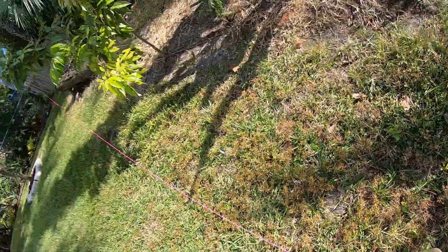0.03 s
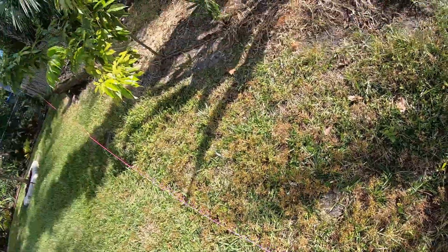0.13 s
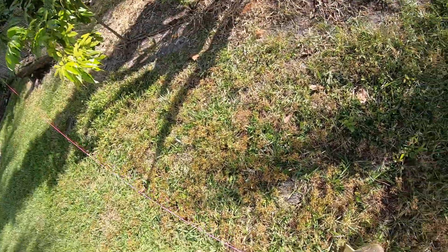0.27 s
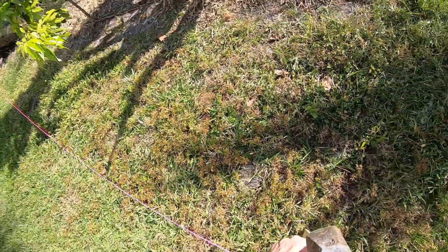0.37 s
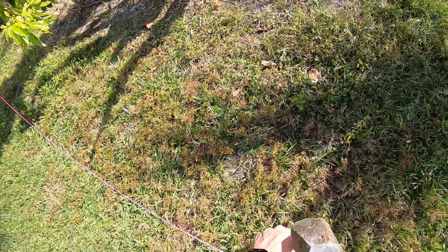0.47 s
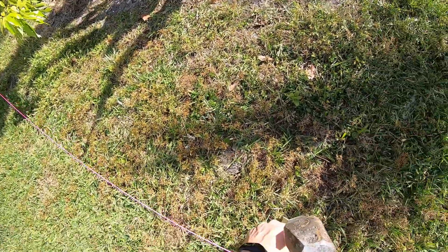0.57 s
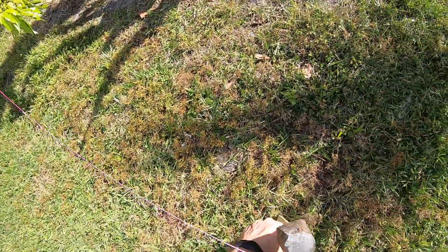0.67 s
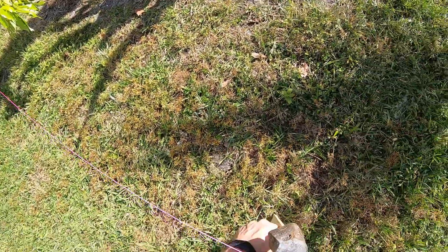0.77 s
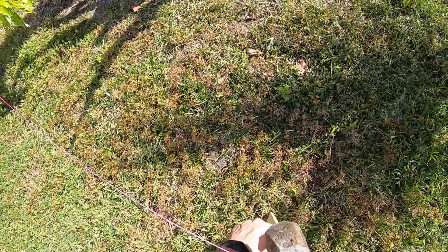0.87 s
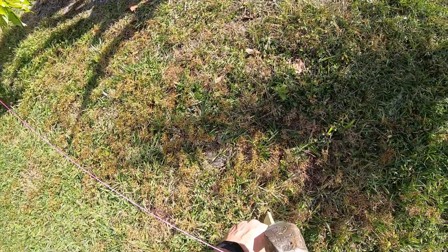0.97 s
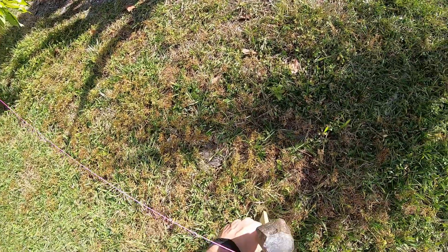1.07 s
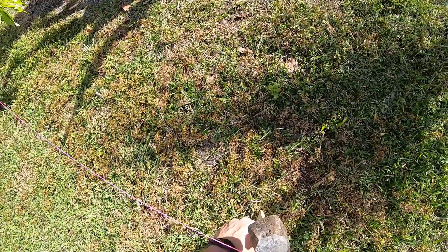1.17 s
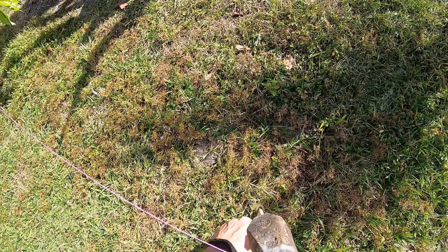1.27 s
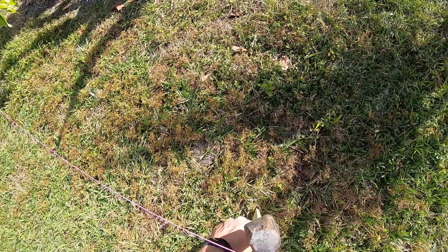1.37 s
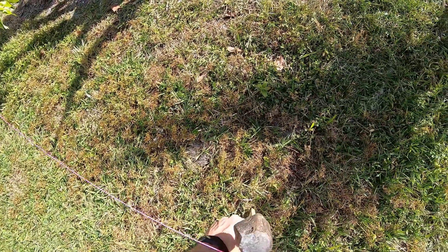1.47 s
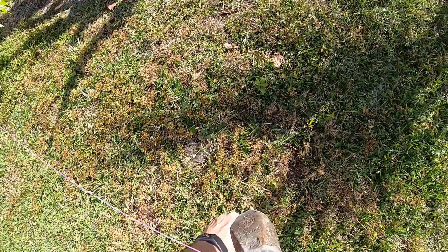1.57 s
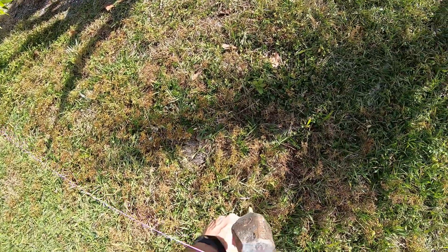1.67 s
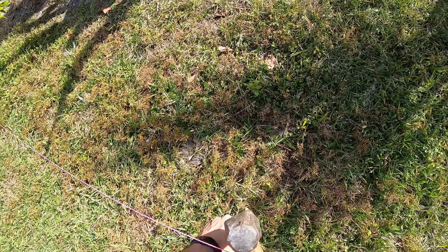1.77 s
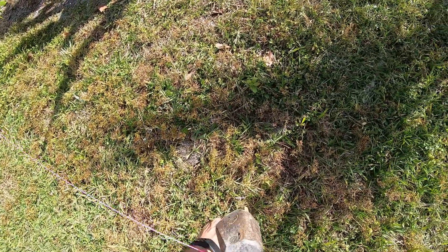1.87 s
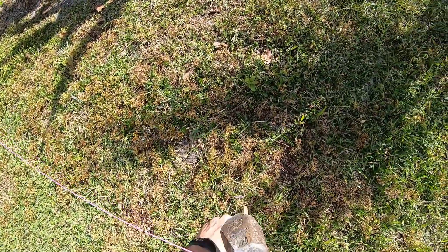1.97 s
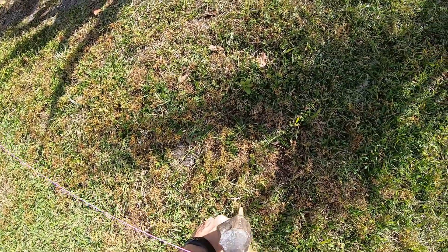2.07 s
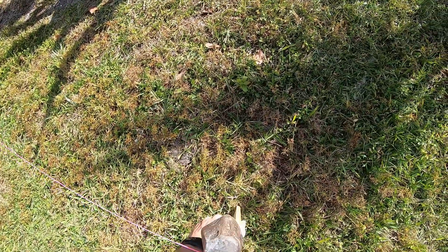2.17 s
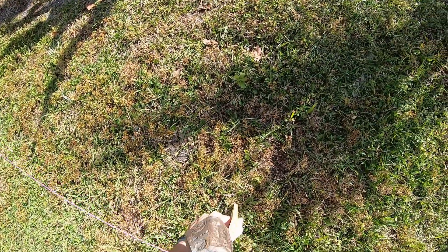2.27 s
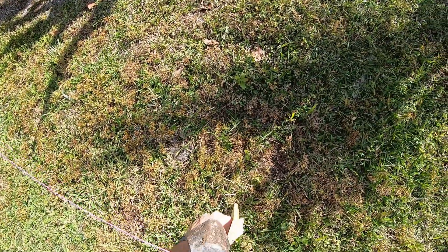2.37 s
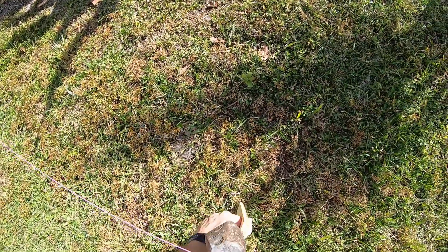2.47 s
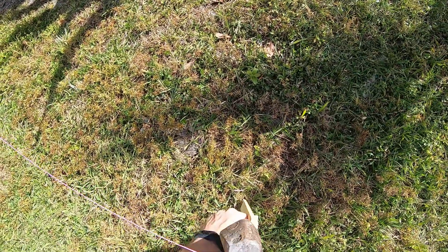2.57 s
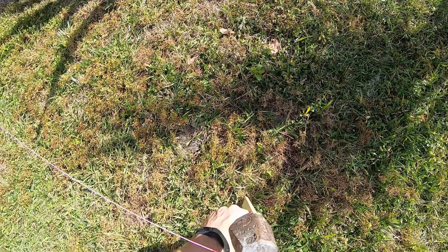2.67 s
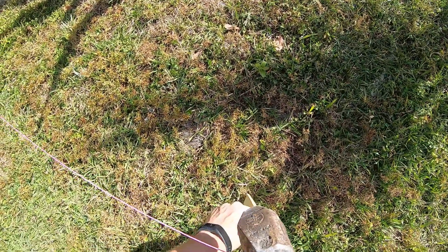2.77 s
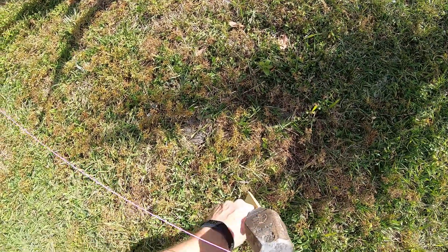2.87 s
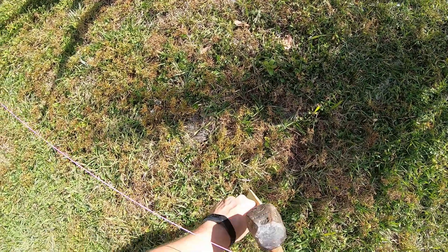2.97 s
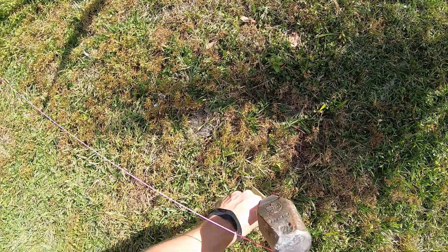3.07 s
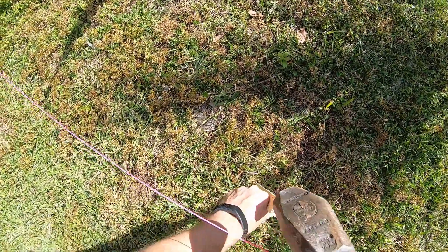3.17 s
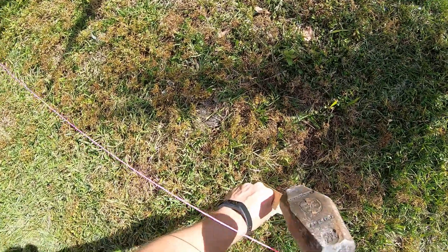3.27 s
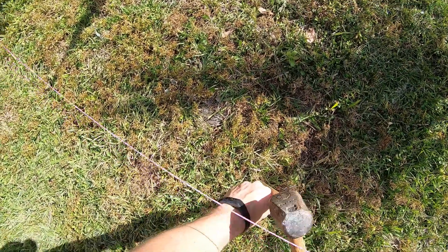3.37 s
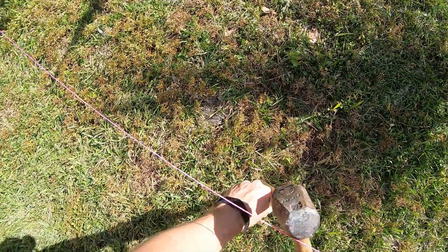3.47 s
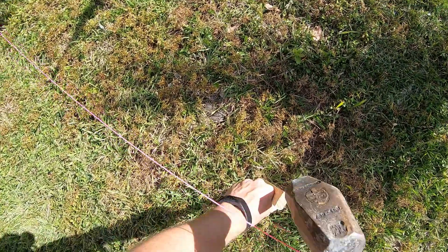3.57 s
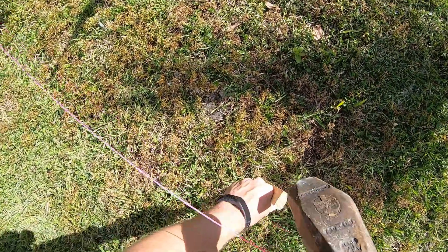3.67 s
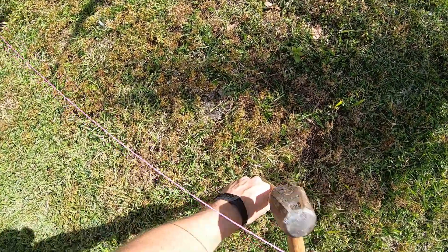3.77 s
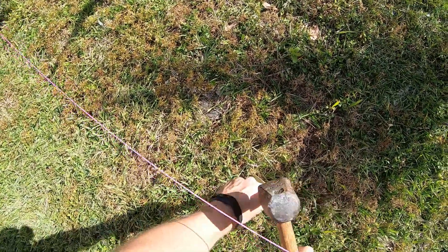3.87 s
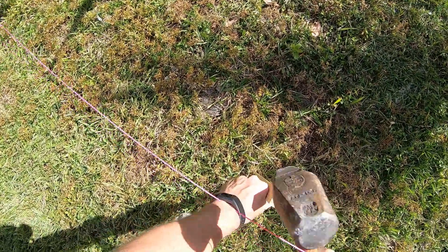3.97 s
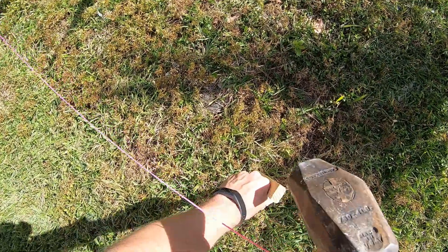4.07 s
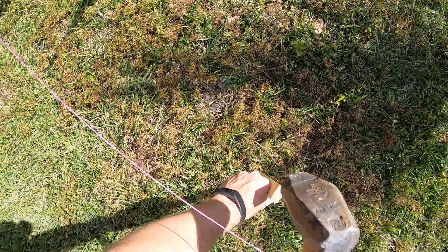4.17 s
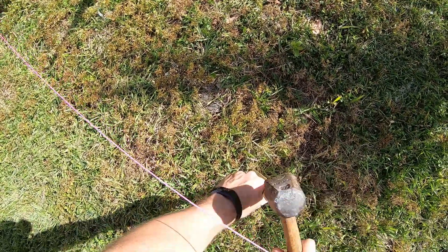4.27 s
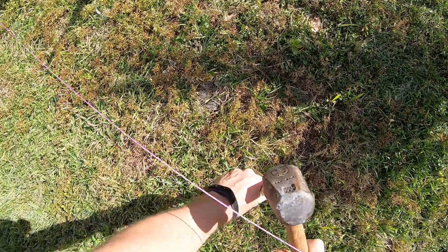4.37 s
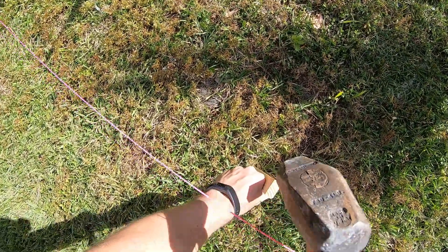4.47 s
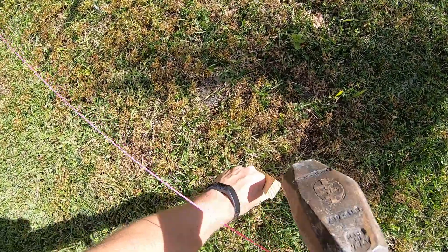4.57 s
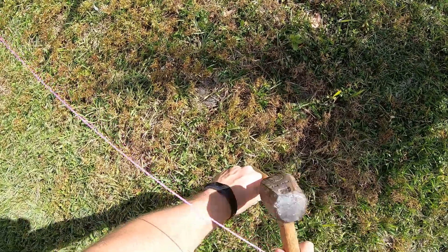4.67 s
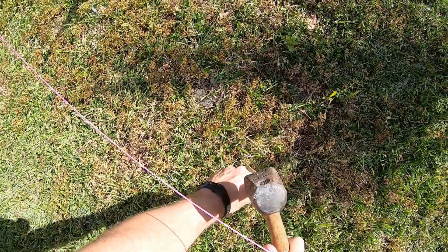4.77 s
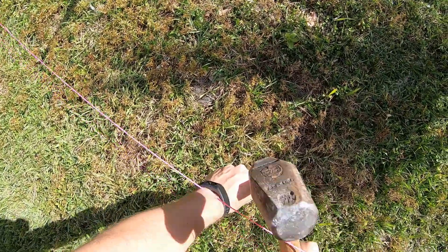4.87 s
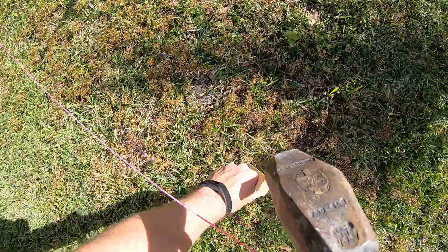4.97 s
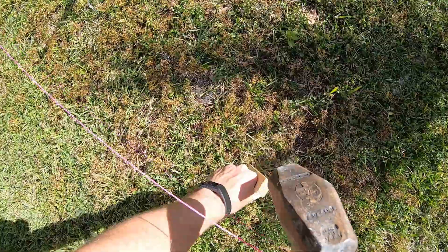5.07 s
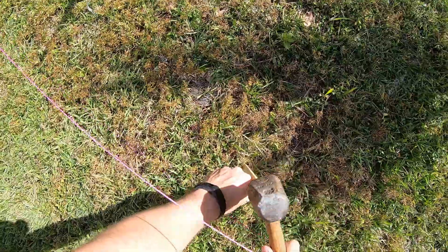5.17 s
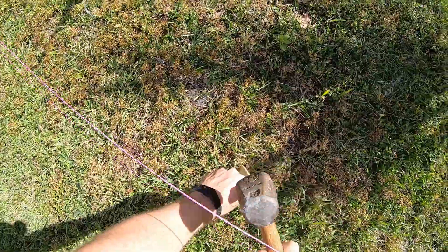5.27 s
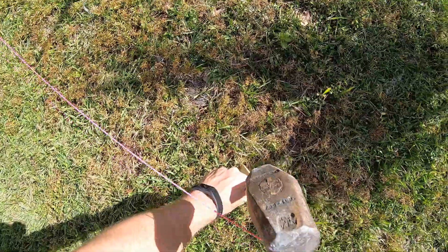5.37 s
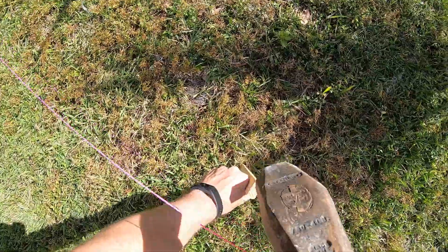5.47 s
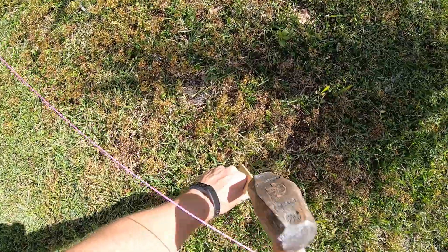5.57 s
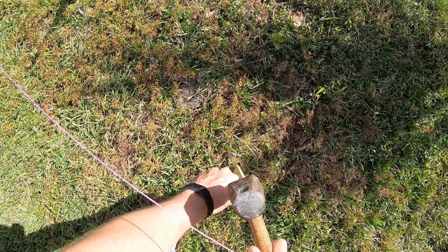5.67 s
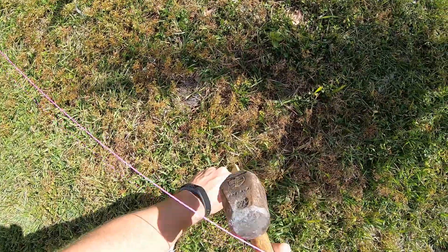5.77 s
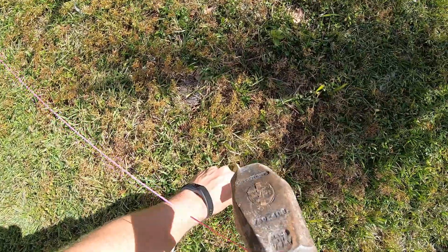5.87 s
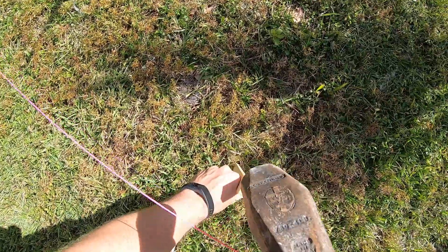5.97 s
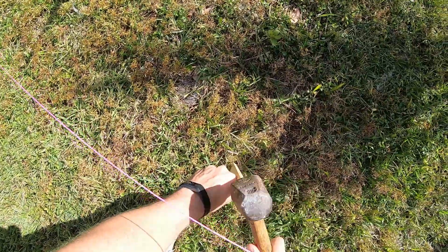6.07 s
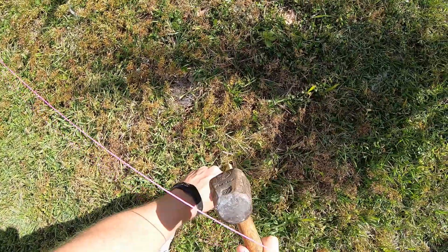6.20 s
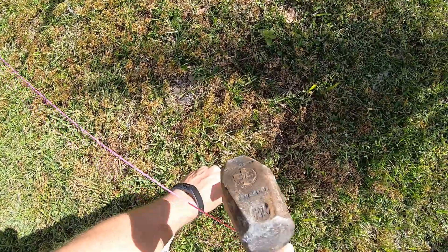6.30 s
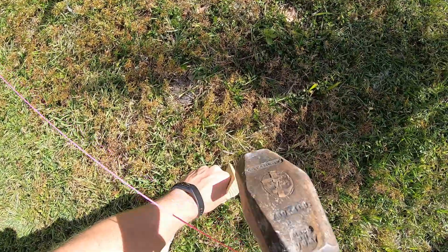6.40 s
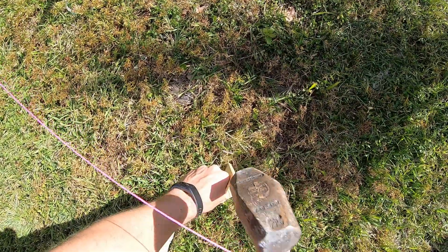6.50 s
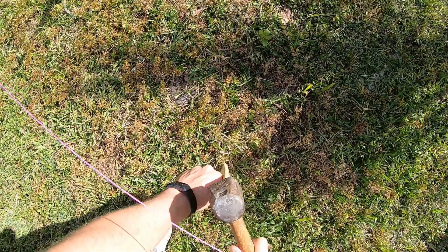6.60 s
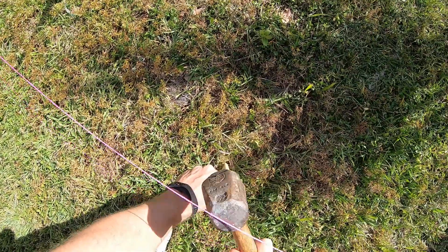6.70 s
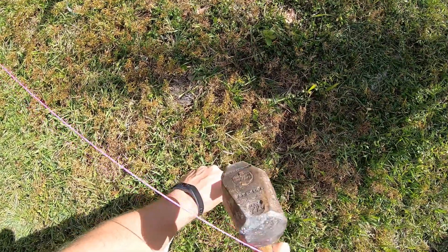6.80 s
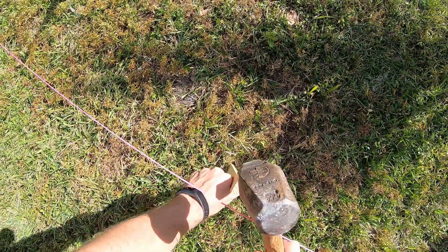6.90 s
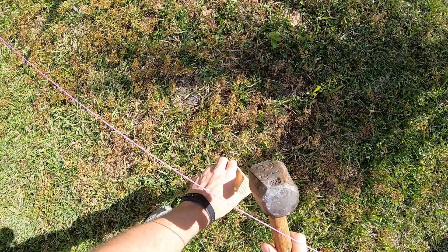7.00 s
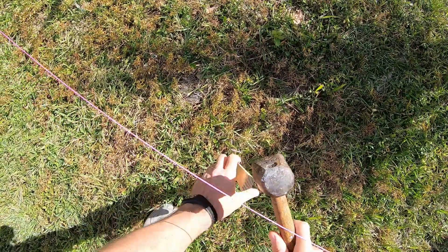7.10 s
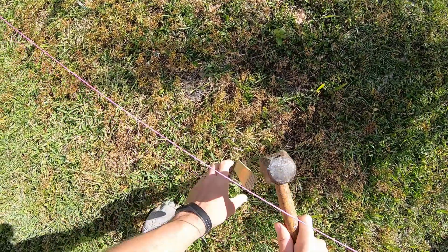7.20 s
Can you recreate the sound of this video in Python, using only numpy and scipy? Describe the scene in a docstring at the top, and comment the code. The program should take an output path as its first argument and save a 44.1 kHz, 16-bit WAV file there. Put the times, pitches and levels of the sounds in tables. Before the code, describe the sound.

Hammer blows drive a wooden stake into lawn soil: short dry woody cracks, low thuds and faint garden echoes over soft wind rumble.

```python
"""A faint outdoor hiss and a low, lumpy rumble of air on the microphone (shaped noise) run throughout.
A small sledgehammer sets a hand-held wooden stake in a lawn with five blows, pauses, then strikes nine more.
Each blow is a short woody crack (decaying modes, crunch noise) with a falling thud and shaking turf from the soil;
modes shift with depth, early contacts chatter and six of the later blows bounce.
The garden returns the cracks as a noise-tail reverb with smeared slaps; small grip ticks fall between late blows."""
import sys
import numpy as np
from scipy import signal
from scipy.fft import rfft, irfft, next_fast_len
from scipy.io import wavfile

SR = 44100
rng = np.random.default_rng(int(sys.argv[2]) if len(sys.argv) > 2 else 0)


def wav_out(sig):
    """Save sig, one row per channel (or a flat mono array), as 16-bit PCM at SR to the path in sys.argv[1]."""
    wavfile.write(sys.argv[1], SR, np.round(np.clip(np.atleast_2d(sig).T, -1, 1) * 32767).astype(np.int16))


N = 319310
BLOW_TIME = np.arange(SR // 4) / SR   # seconds since a contact


def from_db(db):
    """Decibels to gain."""
    return 10 ** (np.asarray(db) / 20)


def rms_one(x):
    """Scale to unit rms."""
    return x / np.sqrt(np.mean(x ** 2) + 1e-20)


def at_hz(points, hz):
    """Read a table on a log-frequency axis."""
    points = np.array(points)
    return np.interp(np.log(np.maximum(hz, 1)), np.log(points[:, 0]), points[:, 1])


def panned(left_right_db):
    """Left and right gains for a level difference; positive is louder on the left."""
    return from_db(np.array([[left_right_db], [-left_right_db]]) / 2)


def add(track, start_s, sound):
    """Mix a sound into a track from start_s."""
    start = int(round(start_s * SR))
    part = sound[..., :N - start]
    track[:, start:start + part.shape[-1]] += part


def noise(spectrum, size):
    """Noise of a given colour, rms 1."""
    hz = np.fft.rfftfreq(size, 1 / SR)
    white = rfft(rng.standard_normal(size))
    return rms_one(irfft(white * from_db(at_hz(spectrum, hz)), size))


def wide_noise(spectrum, likeness):
    """Stereo noise, rms 1, whose channels correlate by a share that depends on frequency."""
    size = next_fast_len(N)
    hz = np.fft.rfftfreq(size, 1 / SR)
    alike = np.clip(at_hz(likeness, hz), -1, 1)
    mid, side = rfft(rng.standard_normal((2, size)))
    both = np.sqrt(1 + alike) * mid + np.sqrt(1 - alike) * side * [[1], [-1]]
    return rms_one(irfft(both * from_db(at_hz(spectrum, hz)), size)[:, :N])


def drift(points_per_s):
    """Random points of spread 1 joined by straight lines."""
    points = rng.standard_normal(SR // 40)
    return np.interp(np.arange(N) / SR * points_per_s, np.arange(len(points)), points)


def strike(rise_s, t60_s):
    """Envelope that swells during the contact and then dies; peak 1."""
    shape = (1 - np.exp(-BLOW_TIME / rise_s)) * np.exp(-np.log(1000) * BLOW_TIME / t60_s)
    return shape / shape.max()


def sine(hz, t):
    """Sine of constant pitch."""
    return np.sin(2 * np.pi * hz * t)


def at_depth(depth, loose, home):
    """A property moves linearly from its loose value (depth 0) to its driven-home value (depth 1)."""
    return loose + depth * (home - loose)


def air(rumble_db=3.5, gust_db=2.2, gust_points_per_s=14):
    """Lumpy wind on the microphone, its level wandering at random, under a distant hiss without gusts."""
    # wind level before rumble_db and gusts: time_s, level_db
    wind_level = [(0.0, -51), (1.71, -55), (2.18, -51), (2.58, -55.5), (3.12, -54), (3.43, -46.5),
                  (4.32, -55.5), (4.51, -52), (5.2, -55), (7.24, -56)]
    # distant hiss: time_s, rms_db
    hiss_level = [(0, -52), (1.0, -53.5), (2.6, -53), (3.8, -57.5), (5.3, -56), (6.4, -55.5), (7.24, -54)]
    # relative spectra: pitch_hz, level_db
    rumble_spectrum = [(12, -37), (20, -3.5), (38, 0), (102, -3.5), (119, -5), (135, 0), (152, -13.5),
                       (186, -10), (276, -27), (420, -36), (550, -33), (920, -120)]
    hiss_spectrum = [(150, -2.5), (250, 2), (273, -4.5), (407, -5), (501, -8), (640, -3.5), (1040, -4),
                     (1220, -4), (1820, -7), (2090, -6), (7310, -18.5), (9660, -22.5), (11500, -39),
                     (14200, -43), (16000, -66)]
    # left-right correlation: pitch_hz, likeness (0-1)
    rumble_likeness = [(25, .5), (60, .85), (150, .97), (400, .97)]
    hiss_likeness = [(60, 0.94), (150, 0.71), (380, 0.71), (950, 0.099), (2380, 0.66), (5980, 0.25),
                     (15000, 0.024)]
    t = np.arange(N) / SR
    wind_db = np.interp(t, *np.transpose(wind_level))
    hiss_db = np.interp(t, *np.transpose(hiss_level))
    gusts_db = gust_db * drift(gust_points_per_s)
    rumble = from_db(wind_db + rumble_db + gusts_db) * wide_noise(rumble_spectrum, rumble_likeness)
    return rumble + from_db(hiss_db) * wide_noise(hiss_spectrum, hiss_likeness)


def garden(cracks, scatter_db=-11.0, far_t60_s=0.74, treble_hz=4500, treble_t60_s=.42,
           near_t60_s=0.11, near_db=3.0, smear_t60_s=.022):
    """Shrubs scatter a thin tail, different on each side, whose treble dies first; fences return smeared slaps."""
    # scatter from grass and shrubs, relative spectrum: pitch_hz, level_db
    scatter_spectrum = [(100, -13), (500, -20), (900, -17), (1600, 1), (3000, 1), (4600, -4), (6200, 3),
                        (8000, 14.5), (11000, 11), (16000, -12)]
    # fences and walls: delay_s, level_db, left_right_db
    echoes = [(.009, -47, -28.5), (.017, -60, -29), (0.054, -56, 34), (.096, -41.5, 4), (0.144, -39, 21)]
    size = SR * 2 // 3
    t = np.arange(size) / SR
    leaves = np.array([noise(scatter_spectrum, size), noise(scatter_spectrum, size)])
    dull = signal.sosfiltfilt(signal.butter(2, treble_hz, fs=SR, output="sos"), leaves)
    treble = leaves - dull
    far = dull * from_db(-60 * t / far_t60_s) + treble * from_db(-60 * t / treble_t60_s)
    near = leaves * from_db(near_db - 60 * t / near_t60_s)
    response = (far + near) * (1 - np.exp(-(t / 0.003) ** 2))
    response *= from_db(scatter_db) / np.sqrt(np.sum(response ** 2) / 2)
    for delay_s, db, left_right_db in echoes:
        slap = dull * (t >= delay_s) * from_db(-60 * np.abs(t - delay_s) / smear_t60_s)
        slap = slap / np.sqrt(np.sum(slap ** 2) / 2)
        response += from_db(db) * panned(left_right_db) * slap
    return signal.fftconvolve(cracks, response, axes=1)[:, :N]


def soil(mid_hz, slide_s, fall=3.19, sway_hz=48, sway_db=-9.5, sway_t60_s=0.34,
         shake_db=-11.5, shake_t60_s=0.12):
    """The stake slides and slows with a thud falling by the ratio fall; the turf sways (sine) and shakes (noise)."""
    t = BLOW_TIME
    hz = mid_hz * fall ** (.5 - np.minimum(t / slide_s, 1))
    slide = (1 - np.exp(-(t / 0.0043) ** 2)) * np.exp(-np.minimum(t / slide_s, 2) ** 6)
    thud = slide * np.sin(2 * np.pi * np.cumsum(hz) / SR)
    sway = from_db(sway_db) * strike(0.0034, sway_t60_s) * sine(sway_hz, t)
    # pitch_hz, level_db
    turf_spectrum = [(30, -19), (130, -9), (280, -12.0), (600, -34.5), (2000, -30), (8000, -88.0)]
    shake = from_db(shake_db) * strike(0.0009, shake_t60_s) * noise(turf_spectrum, len(t))
    return thud + sway + shake


def flex(flex_hz=430, flex_t60_s=0.015, flex_db=-25.5):
    """The whole stake bends briefly in the hand: a short hollow bump."""
    return -from_db(flex_db) * strike(0.0021, flex_t60_s) * sine(flex_hz, BLOW_TIME)


def fibres(t60_s, rise_s=0.00037, side_db=-5.5):
    """End grain crushes under the steel face in a brief crunch of stereo noise."""
    # splintering grain, relative spectrum: pitch_hz, level_db
    grain_spectrum = [(200, -10), (700, -5), (2000, 2), (4200, 8), (6500, 5), (7600, -10), (9000, -9),
                      (11000, -24), (16000, -33)]
    mid = noise(grain_spectrum, len(BLOW_TIME))
    side = noise(grain_spectrum, len(BLOW_TIME))
    return strike(rise_s, t60_s) * (mid + from_db(side_db) * side * [[1], [-1]])


def sideways_crunch():
    """Crunch squeezed out sideways from under the hammer face, band-passed; heard only as scatter."""
    band = signal.butter(2, [1400, 4200], "band", fs=SR, output="sos")
    return signal.sosfilt(band, fibres(t60_s=0.007))


def stake_modes(depth, clack_hz, brightness_db, bend_db, pivot_hz=2500):
    """Rows (Hz, dB): bends rise as the free length shortens; a square blow favours high modes; the hand damps bend 2."""
    # bending modes: loose_hz, home_hz, loose_db, home_db
    bend_table = [(1062, 1327, -22, -2.5), (1220, 2780, -15, -5.5), (5954, 6720, -19, -25)]
    # clack, shifting with where the hammer lands: multiple of clack_hz, loose_db, home_db
    clack_table = [(1, -14.5, -4), (1.275, -16.5, -9)]
    modes = []
    for (loose_hz, home_hz, loose_db, home_db), hand_db in zip(bend_table, (0, bend_db, 0)):
        modes.append((at_depth(depth, loose_hz, home_hz), at_depth(depth, loose_db, home_db) + hand_db))
    for multiple, loose_db, home_db in clack_table:
        modes.append((multiple * clack_hz, at_depth(depth, loose_db, home_db)))
    return [(hz, db + brightness_db * np.log2(hz / pivot_hz)) for hz, db in modes]


def notch(x, hz, width_hz):
    """Cut a narrow hollow."""
    return signal.lfilter(*signal.iirnotch(hz, hz / width_hz, fs=SR), x)


def wood(t60_s, knock_db, left_right_db, modes, knock_hz=900, knock_t60_s=0.0069,
         knock_left_right_db=-10.5, contact_s=0.00073, radiates_above_hz=650, uneven_db=1.5,
         right_lead_s=.00001, split_hz=1850, hollow_width_hz=260, bend_hollow_hz=580, bend_width_hz=130):
    """Stake modes and a hollow knock start together; hand and soil damp them within milliseconds."""
    t = BLOW_TIME + [[0], [right_lead_s]]
    modes = np.reshape(modes, (-1, 2))
    knock_gain = from_db(knock_db) * panned(left_right_db + knock_left_right_db)
    out = knock_gain * strike(contact_s, knock_t60_s) * sine(knock_hz, t)
    for hz, db in modes:
        # each mode gets a small random left-right difference on every blow
        gain = from_db(db) * panned(left_right_db + uneven_db * rng.standard_normal())
        out = out + gain * strike(contact_s, t60_s) * sine(hz, t)
    # hollow midway between the modes on either side of split_hz
    low = modes[:, 0] < split_hz
    hollow_hz = (modes[low, 0].max() + modes[~low, 0].min()) / 2
    out = notch(out, hollow_hz, hollow_width_hz)
    # second hollow, below the knock
    out = notch(out, bend_hollow_hz, bend_width_hz)
    # a slim stake radiates little bass
    return -signal.lfilter(*signal.butter(2, radiates_above_hz, "high", fs=SR), out)


def hammer(bounce_cut_hz=2100, tick_cut_hz=3000, grip_power=4.4):
    """All contacts of hammer and stake; returns direct cracks, cracks feeding the scatter, and thuds."""
    # hammer on stake: start_s, depth (0 loose - 1 driven home), force_db, clack_hz, brightness_db per octave,
    # bend_db (second bend, low when the hand grips hard), crush_db (fibres, relative to force),
    # thud_db (soil, relative to force), left_right_db
    blows = [(0.891, 0.011, -11.5, 3210, 0.5, 6, -23, -22.5, -4),
             (1.2534, .35, -1, 3480, -5, -1.5, -23.5, -36.5, 0),
             (1.5954, 0.044, -0.3, 2890, 1, 5.5, -21.5, -30.5, -4),
             (1.9246, 0.17, 2.54, 3130, -0.5, 0.4, -18.5, -32.5, 0.5),
             (2.2384, .28, 2.5, 3500, 2, -1.5, -22, -31, -1),
             (3.1265, .48, 2, 3100, 2, -2.5, -20.5, -27.5, -1.5),
             (3.562, .58, 1.8, 3340, 1.5, 1.3, -20, -24.5, -2),
             (4.0071, .62, 2.5, 3474, .4, -0.8, -21.5, -24, -1.5),
             (4.4449, 0.75, 1.5, 4000, 0.5, -10, -14.5, -21, -1.5),
             (4.9041, 0.695, 0.7, 4030, -1.5, -3.5, -16, -21, -1.5),
             (5.359, 0.96, -1.24, 3470, -1.5, 3, -11, -17, -1.7),
             (5.8334, 0.96, -0.46, 3530, -1.3, 2.5, -15, -17, -0.5),
             (6.2946, 0.96, -1.1, 3250, -1.6, 2.5, -11.5, -17.5, .7),
             (6.7732, 0.94, -2.1, 3350, -1.5, 2, -17, -13.5, 1.5)]
    # the still loose stake chatters against the hammer: start_s, level_db (relative to its blow)
    chatter = [(0.8925, 7.5), (.8951, 5), (0.8982, -3.5), (1.2542, -1.5), (1.5992, -13.5), (1.9275, -28)]
    # the head drops back on the stake: start_s, thud_db, thud_hz (mid-slide), tick_db (before low-pass)
    bounces = [(3.172, -33, 186, -30.5), (4.053, -31.5, 227, -32.5), (4.95, -28, 206, -23),
               (5.897, -28.5, 202, -27.5), (6.3336, -20, 195, -23.5), (6.816, -17, 207, -30)]
    # grip on handle and stake: start_s, level_db (before high-pass)
    ticks = [(3.723, -50), (5.572, -64), (6.043, -64), (6.513, -59), (6.98, -56)]
    cracks, outgoing, thuds = np.zeros((3, 2, N))
    for start_s, depth, force_db, clack_hz, brightness_db, bend_db, crush_db, thud_db, left_right_db in blows:
        # the soil damps the wood once it grips, which comes late
        grip = np.clip(depth, 0, 1) ** grip_power
        wood_t60_s = at_depth(grip, loose=0.0061, home=0.0034)
        knock_db = at_depth(depth, loose=-17, home=-15.5)
        modes = stake_modes(depth, clack_hz, brightness_db, bend_db)
        crack = wood(wood_t60_s, knock_db, left_right_db, modes)
        # the end grain packs down
        crunch = fibres(t60_s=at_depth(depth, loose=0.015, home=0.007))
        crack = crack + from_db(crush_db) * panned(left_right_db) * crunch
        # deeper blows have a weaker scattered tail relative to the direct crack
        scatter_db = force_db + at_depth(depth, loose=0.5, home=-4.5)
        touches = [(start_s, 0)] + [(at_s, db) for at_s, db in chatter if abs(at_s - start_s) < .1]
        for at_s, db in touches:
            add(cracks, at_s, from_db(force_db + db) * crack)
            add(outgoing, at_s, from_db(scatter_db + db) * crack)
        sideways_db = scatter_db + at_depth(depth, loose=-8, home=-22.5)
        add(outgoing, start_s, from_db(sideways_db) * sideways_crunch())
        # packed soil is stiffer
        thud_hz = at_depth(depth, loose=151, home=251.4)
        thud = soil(thud_hz, slide_s=0.0147, sway_db=-11.5)
        add(thuds, start_s, flex() + from_db(force_db + thud_db) * thud)
    for start_s, thud_db, thud_hz, tick_db in bounces:
        # a slow contact is a dull one
        dull_tick = signal.lfilter(*signal.butter(2, bounce_cut_hz, fs=SR), fibres(t60_s=0.009))
        thud = soil(thud_hz, slide_s=0.012, fall=2.0, sway_db=-46.0, shake_db=-18.0)
        add(thuds, start_s, flex(flex_db=tick_db - 10.5))
        add(cracks, start_s, from_db(tick_db) * dull_tick)
        add(thuds, start_s, from_db(thud_db) * thud)
    for start_s, db in ticks:
        tick = signal.lfilter(*signal.butter(1, tick_cut_hz, "high", fs=SR), fibres(t60_s=0.0069))
        add(cracks, start_s, from_db(db) * tick)
    return cracks, outgoing, thuds


def scene():
    """Open air, garden scatter and blows."""
    cracks, outgoing, thuds = hammer()
    return air() + garden(outgoing) + thuds + cracks


def record(dry, cutoff_hz=16500):
    """The tallest peaks are rounded off and the top is cut."""
    rounded = dry / (1 + dry ** 6) ** (1 / 6)
    return signal.sosfilt(signal.ellip(10, .1, 80, cutoff_hz, fs=SR, output="sos"), rounded)


dry = scene()
out = record(dry)
wav_out(out)
```